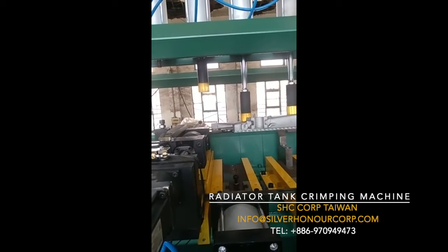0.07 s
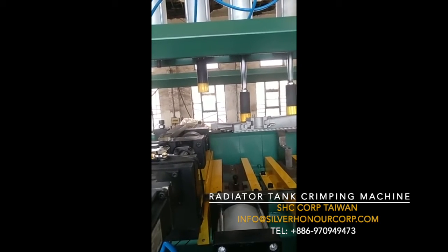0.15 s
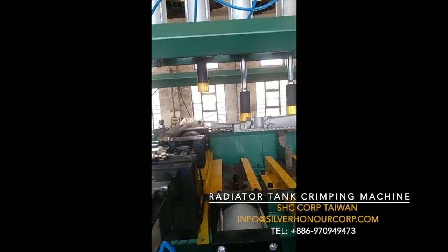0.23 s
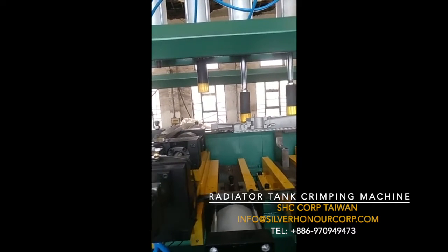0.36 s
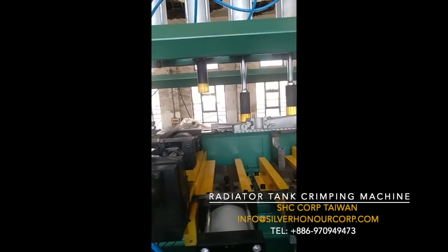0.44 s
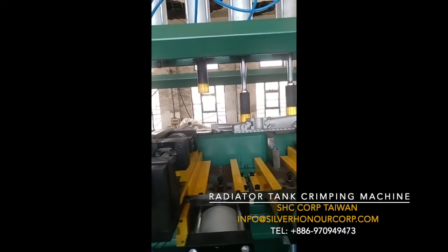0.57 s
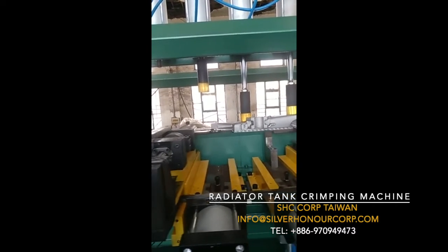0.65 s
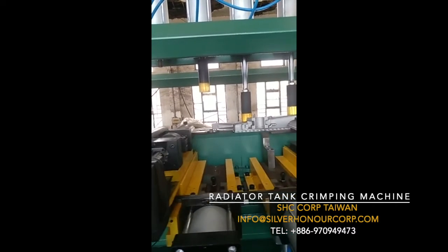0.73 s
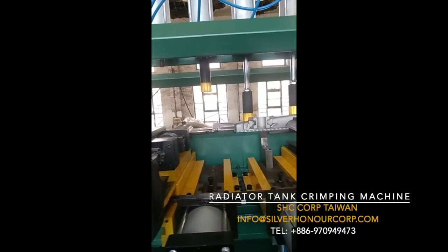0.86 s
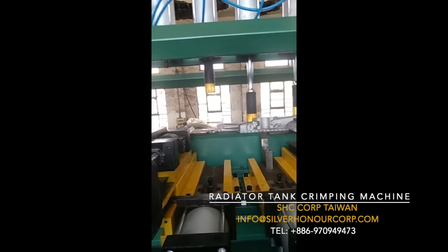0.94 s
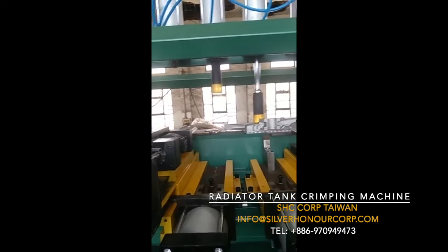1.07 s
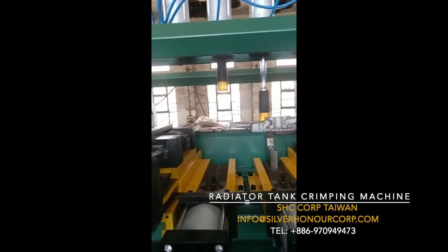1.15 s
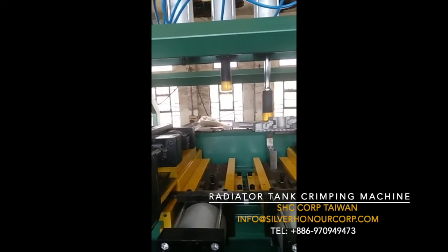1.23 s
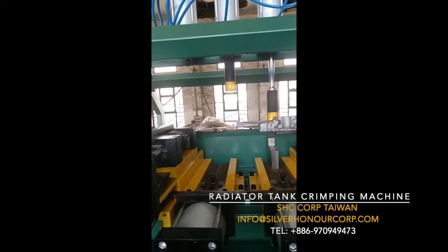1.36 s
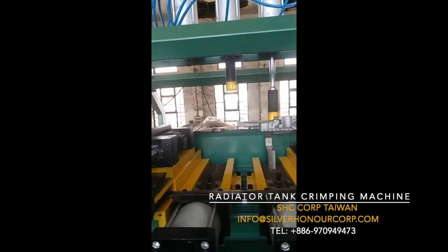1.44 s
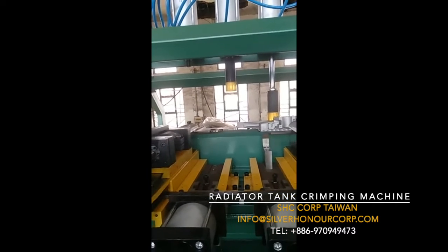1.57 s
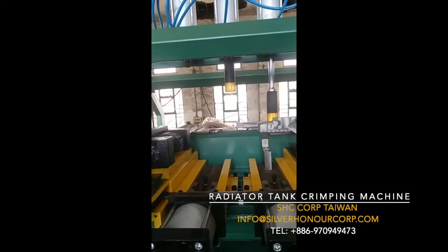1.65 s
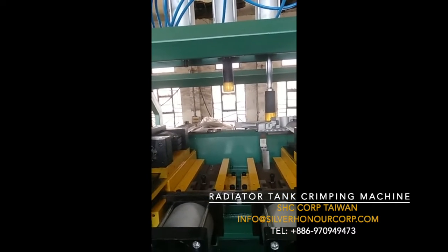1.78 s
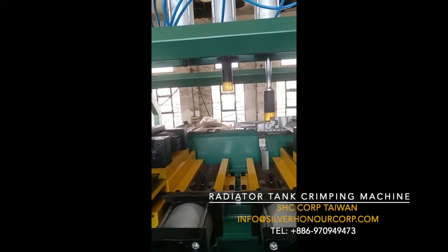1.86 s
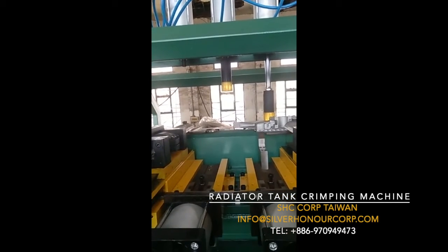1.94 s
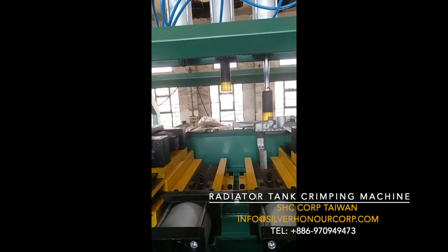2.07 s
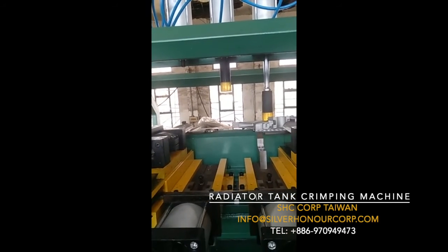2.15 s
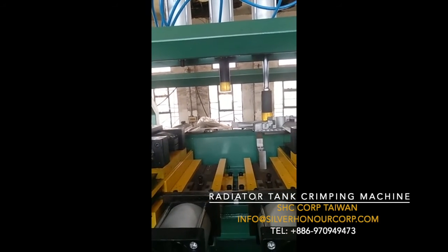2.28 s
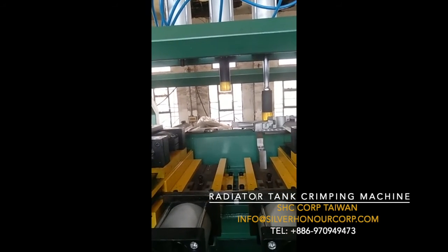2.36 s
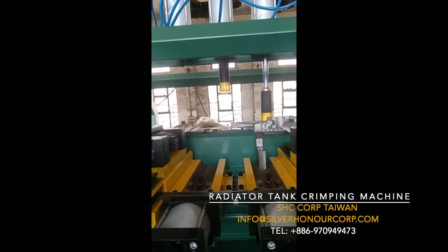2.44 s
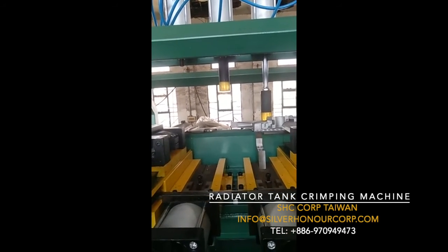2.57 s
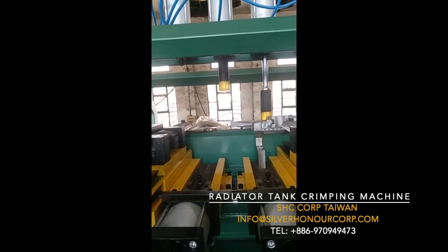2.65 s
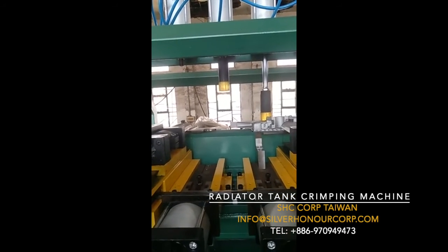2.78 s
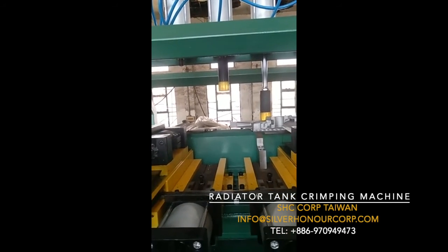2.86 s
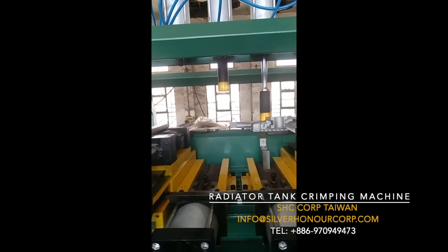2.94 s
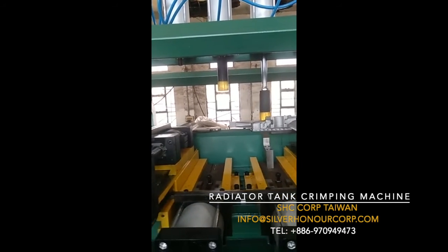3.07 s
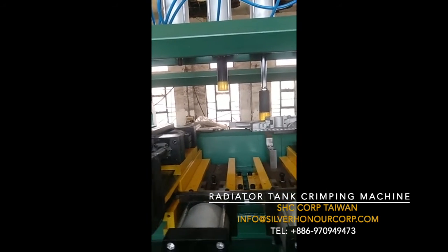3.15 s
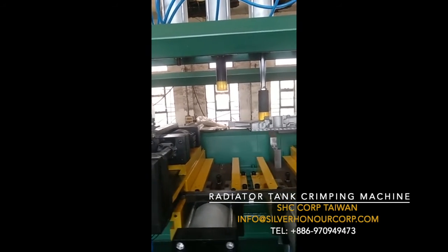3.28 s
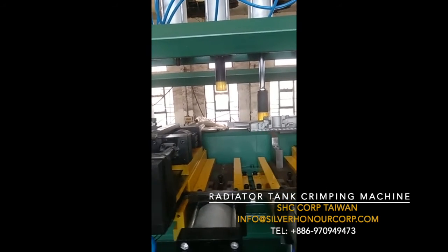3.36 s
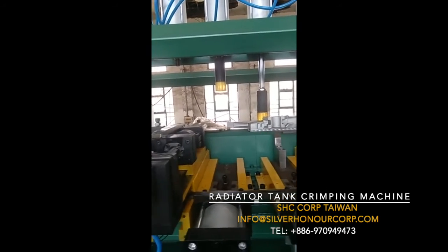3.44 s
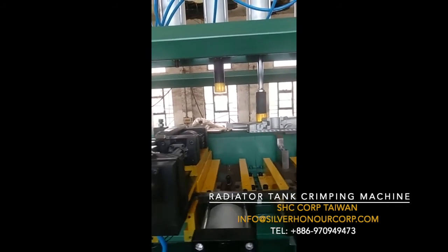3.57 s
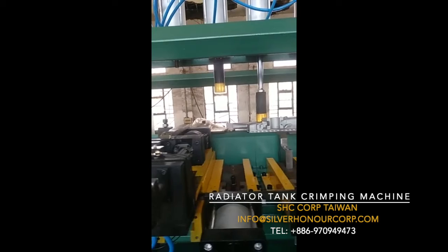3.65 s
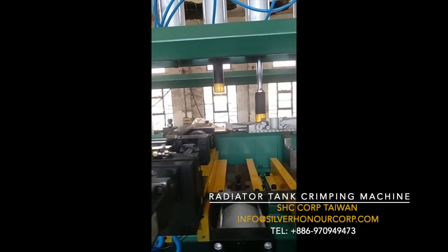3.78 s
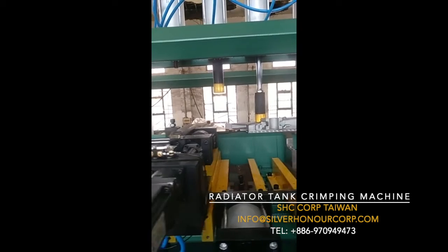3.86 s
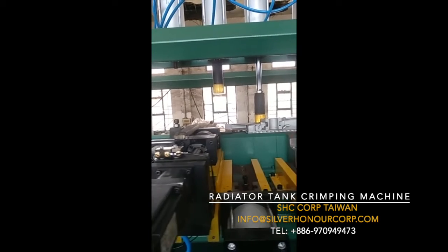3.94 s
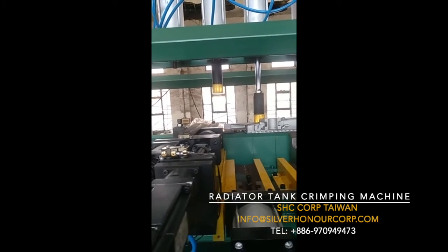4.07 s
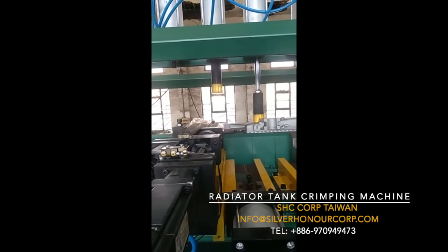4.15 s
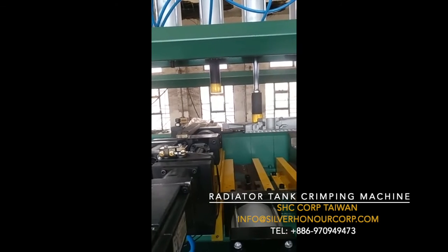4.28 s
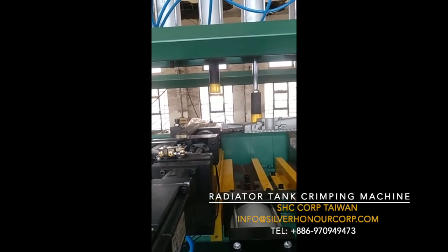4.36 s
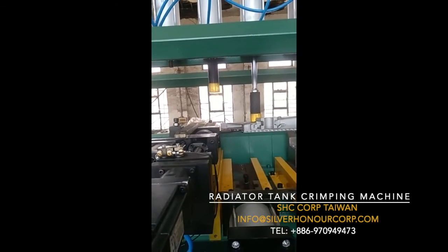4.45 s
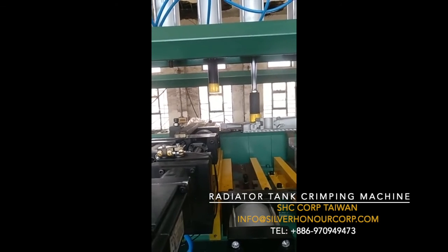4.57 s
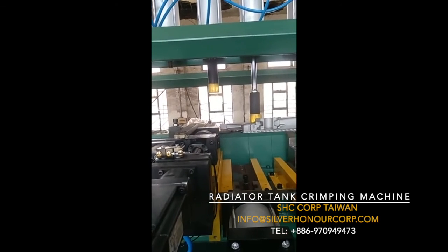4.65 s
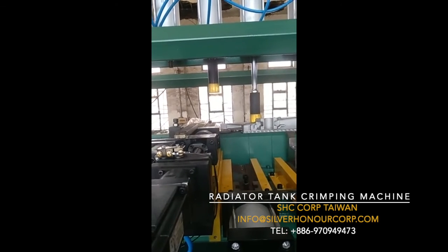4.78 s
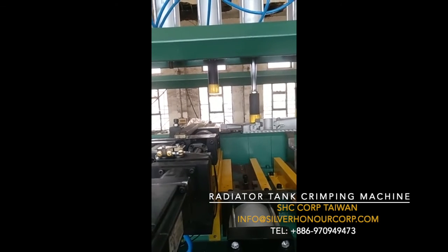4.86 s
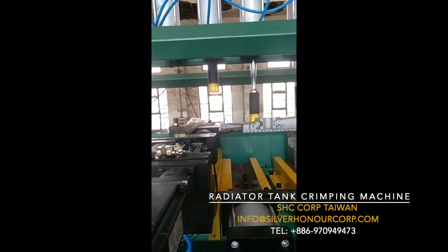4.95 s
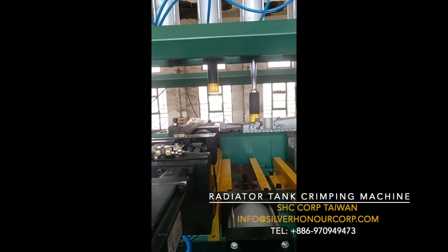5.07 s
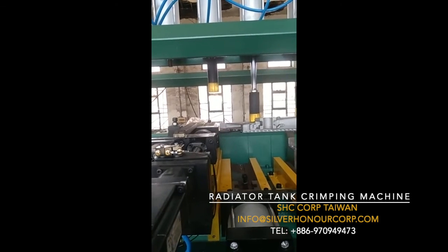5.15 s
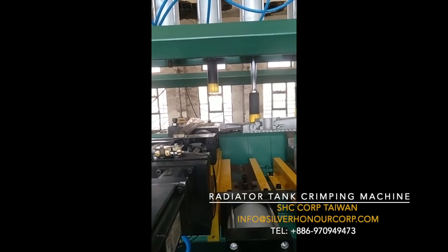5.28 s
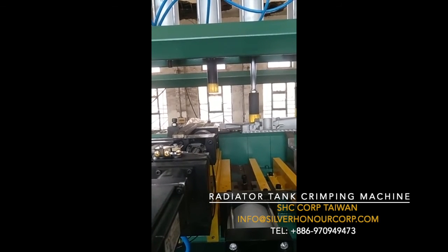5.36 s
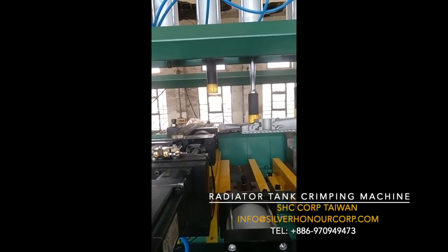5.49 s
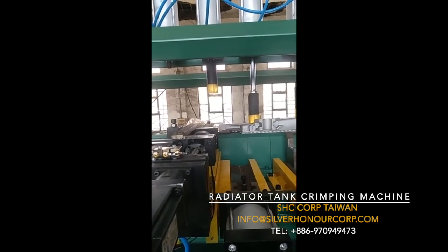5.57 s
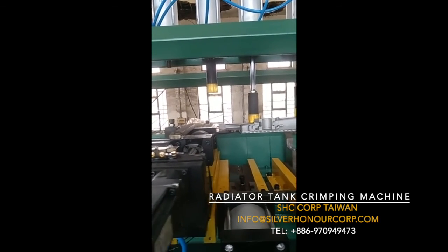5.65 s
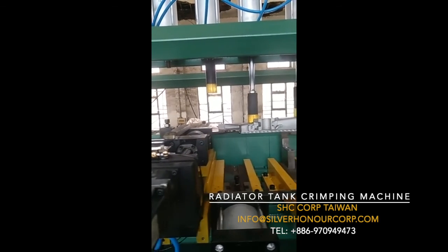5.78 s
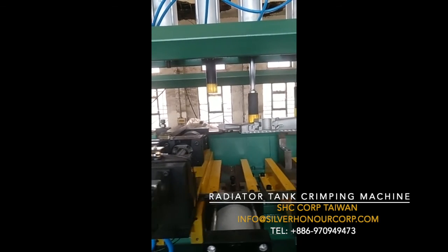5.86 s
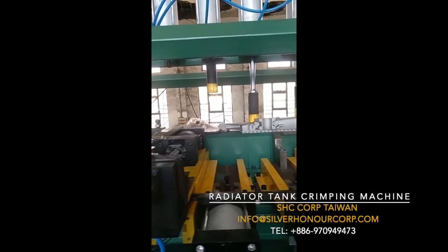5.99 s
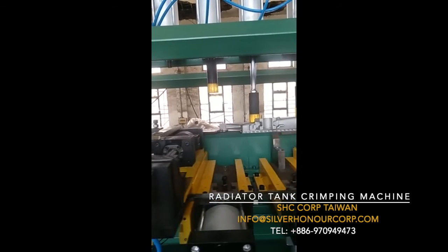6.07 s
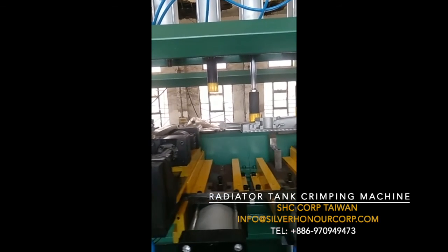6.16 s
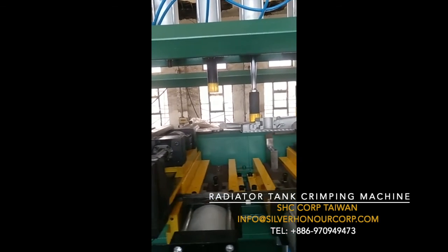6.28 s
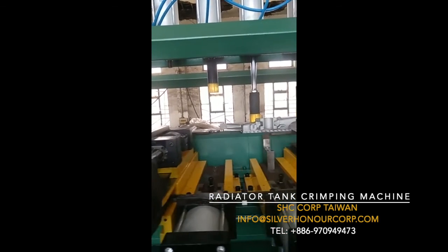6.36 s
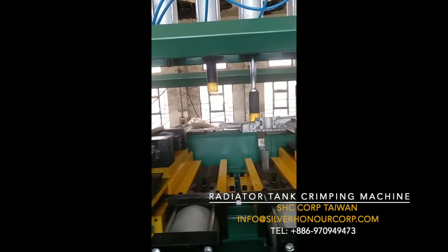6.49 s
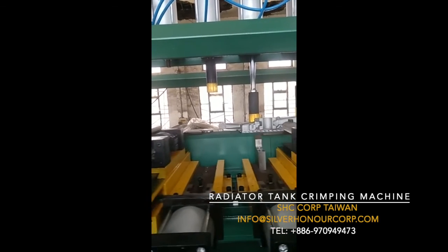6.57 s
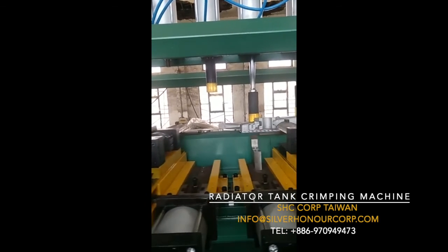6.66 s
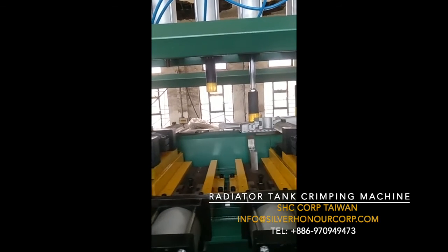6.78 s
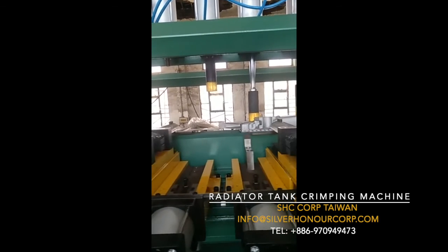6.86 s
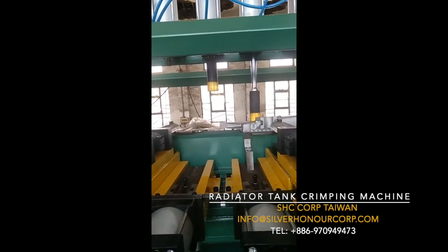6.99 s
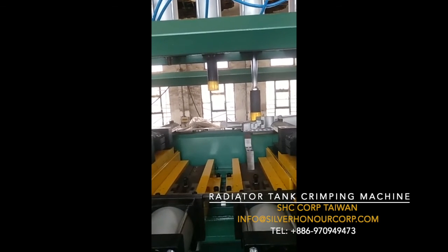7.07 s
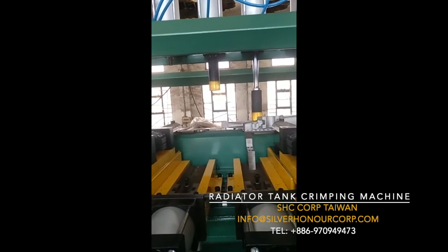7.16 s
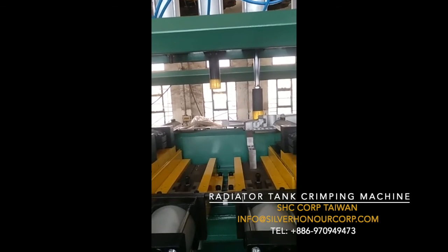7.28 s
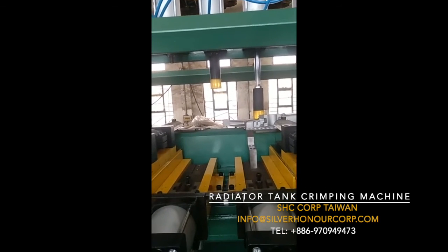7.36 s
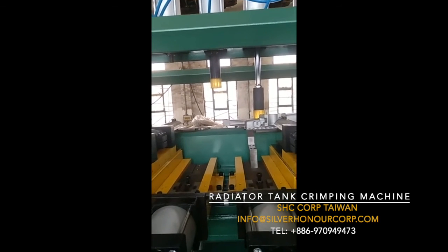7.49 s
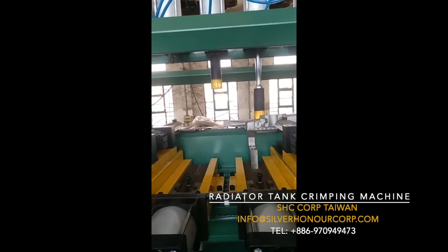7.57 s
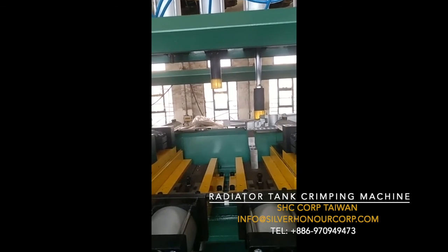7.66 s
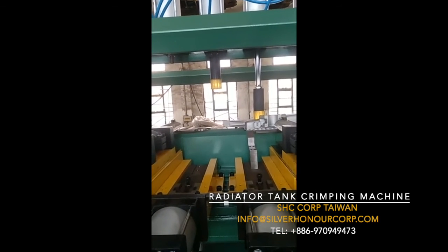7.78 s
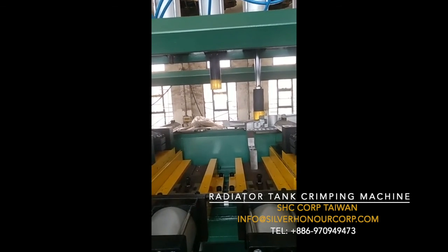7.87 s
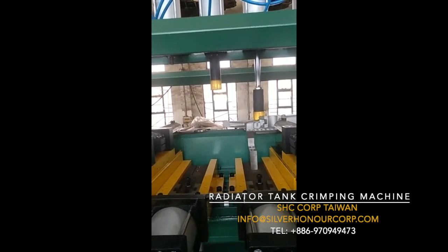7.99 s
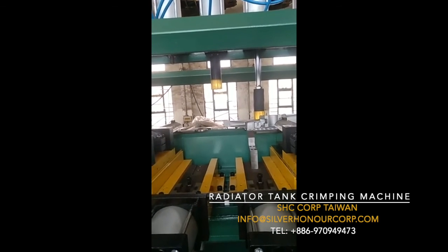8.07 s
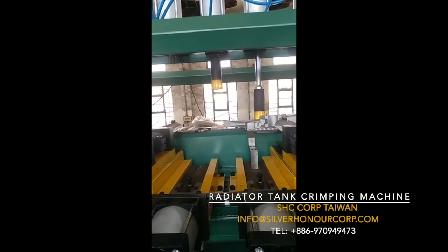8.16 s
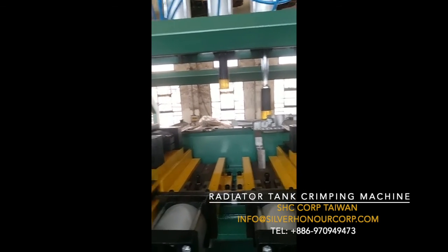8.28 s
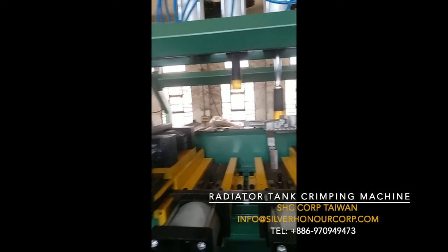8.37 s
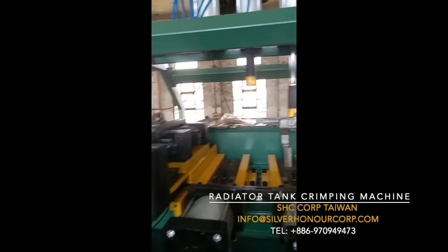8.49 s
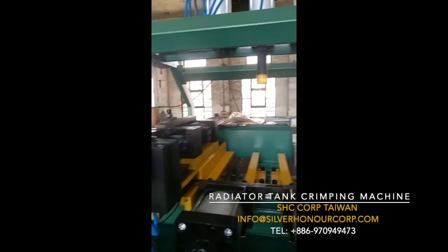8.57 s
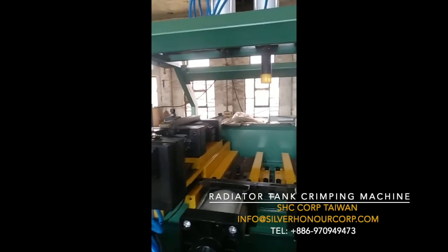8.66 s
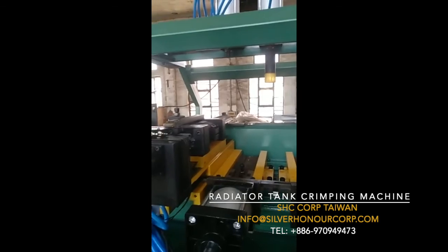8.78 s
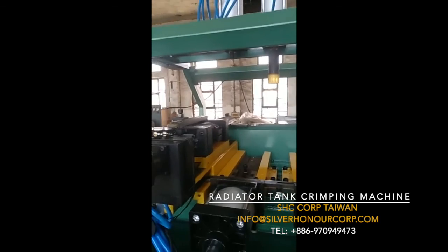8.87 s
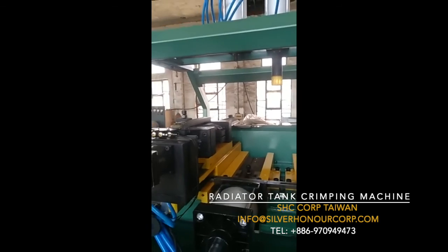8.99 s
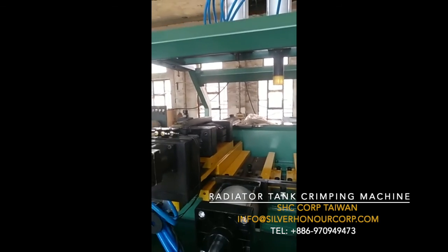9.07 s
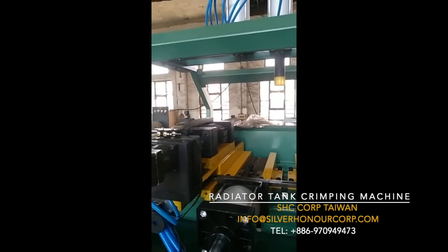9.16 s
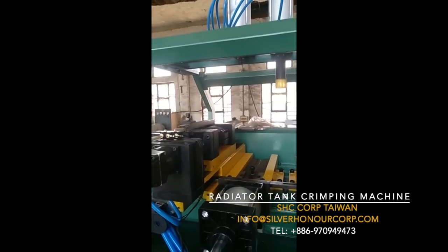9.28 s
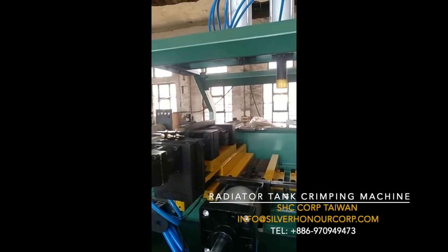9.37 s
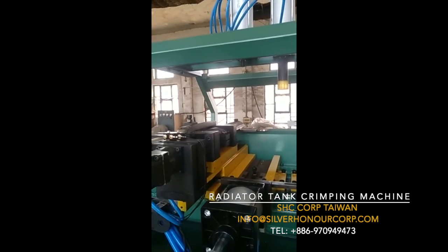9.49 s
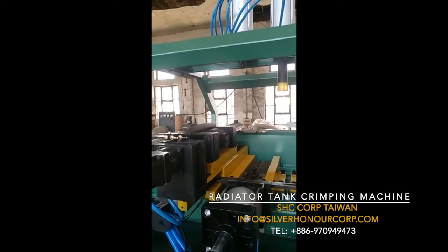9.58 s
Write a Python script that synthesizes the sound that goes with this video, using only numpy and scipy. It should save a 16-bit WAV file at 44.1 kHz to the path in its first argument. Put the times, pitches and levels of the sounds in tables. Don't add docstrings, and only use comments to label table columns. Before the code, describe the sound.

Three abrupt, loud bursts of compressed air with fast whirring gear teeth, each starting with a sharp valve knock and steady until braking, its tail bleeding into the hall. Between the first two, a short clattering feed slide; after the third, two seconds of dense metallic ticking with small motor groans. Distant machines murmur and whine faintly. Mono phone pickup with limited treble.

```python
import sys
import numpy as np
from scipy import signal
from scipy.fft import rfft, irfft
from scipy.io import wavfile
from scipy.ndimage import uniform_filter1d, map_coordinates

SR = 44100
rng = np.random.default_rng(int(sys.argv[2]) if len(sys.argv) > 2 else 0)


def gain_from_db(level_db):
    decades = np.asarray(level_db, float) / 20
    return 10 ** decades


def transcribe(signal):
    frames = np.atleast_2d(signal).T
    limited = np.clip(frames, -1, 1)
    pcm = np.round(limited * 32767).astype(np.int16)
    wavfile.write(sys.argv[1], SR, pcm)


N = 424683
T = np.arange(N) / SR
TOP_HZ = 7570


def unit(x):
    return x / np.sqrt(np.mean(x ** 2) + 1e-20)


def along(points, hz):
    f, v = np.transpose(points)
    return np.interp(np.log(hz + 1), np.log(f + 1), v)


def curves(rows):
    s, *cols = np.transpose(rows)
    gate = uniform_filter1d(1. * ((T > s[0]) & (T < s[-1])), size=400)
    return [gate] + [np.interp(T, s, c) for c in cols]


def wobble(rate):
    return map_coordinates(rng.standard_normal(int(N * rate / SR) + 4), [T * rate])


def coloured(x, spectrum):
    m = 8192
    cep = irfft(np.log(gain_from_db(along(spectrum, np.fft.rfftfreq(m, 1 / SR))) + 1e-6), m)
    cep[1:m // 2] *= 2
    cep[m // 2 + 1:] = 0
    return signal.fftconvolve(x, irfft(np.exp(rfft(cep)), m))[:N]


def rush(spectrum, patchy_db):
    z = signal.stft(rng.standard_normal(N), nperseg=512)[2]
    field = uniform_filter1d(rng.standard_normal(z.shape), size=6, axis=0)
    field = uniform_filter1d(field, size=9, axis=1)
    patchy = signal.istft(z * gain_from_db(patchy_db * unit(field)), nperseg=512)[1][:N]
    return unit(coloured(patchy, spectrum))


def tones(lines, unsteady_db):
    return sum(gain_from_db(db + 0.5 + unsteady_db * wobble(5.4)) * np.sin(2 * np.pi * hz * T) for hz, db in lines)


# frequency in Hz, density in dB per Hz.
MURMUR = [(12, -50.5), (20, -26.5), (103, -4), (245, -1.5), (373, -4.5), (569, -2.5), (1140, -6.5),
          (1260, -1), (1530, -5.5), (2340, -8.5), (2650, -3.5), (2850, -7), (3150, -10.5), (6150, -11),
          (7500, -11), (9750, -46), (16500, -120)]
# frequency in Hz, level in dB.
FAR_LINES = [(247.6, -57), (948, -60), (1237, -51), (1389, -53), (2628, -58)]
# time in seconds, level in dB.
HOLDING_DRIVE = [(0, -49), (.2, -57), (1.8, -45.5), (2.6, -47.5), (4.5, -47.5), (5.5, -49), (7, -51.5),
                 (7.3, -60), (9.64, -54.5)]
MURMUR_DB, SERVO_HZ = -37, 2668.5


def machines():
    servo_db = curves(HOLDING_DRIVE)[1] + 4.5 + .7 * wobble(2.5)
    servo = gain_from_db(servo_db) * np.sin(2 * np.pi * SERVO_HZ * T)
    murmur = gain_from_db(MURMUR_DB - 2.5) * rush(MURMUR, patchy_db=1.96)
    return murmur + tones(FAR_LINES, unsteady_db=2.0) + servo


# frequency in Hz, t60 in seconds.
HALL_DECAY = [(100, 2.1), (500, 1.26), (2000, 0.73), (7000, 0.27)]


def hall(x):
    hz, t, z = signal.stft(rng.standard_normal(2 * SR), SR, nperseg=256)
    decay = gain_from_db(-60 * t / along(HALL_DECAY, hz)[:, None])
    tail = signal.istft(z * decay, SR, nperseg=256)[1]
    return signal.fftconvolve(x, tail / np.linalg.norm(tail))[:N]


# start in seconds, peak in dB, frequency in Hz, rise in seconds, t60 in seconds.
FRAME_KNOCKS = [(.149, -24, 2200, .002, .06), (.165, -14, 1500, .003, .05), (.166, -22, 6500, .002, .04),
                (1.5, -28, 290, .03, .8), (1.5, -35, 170, .04, 2), (2.711, -26, 1800, .003, .04),
                (2.719, -17, 3780, .003, .06), (2.715, -25, 220, .01, .4), (2.72, -20, 580, .02, .6),
                (2.8, -28, 165, .04, 1.2), (4.05, -35, 165, .05, 1.5), (4.1, -38, 200, .05, 1.5),
                (5.53, -25, 1300, .003, .06), (5.537, -19, 2800, .003, .04), (6.86, -31, 290, .03, .7),
                (6.85, -36, 160, .03, 1.)]


def knocks():
    out, t = np.zeros(N + 2 * SR), np.arange(SR) / SR
    for s, db, hz, rise, t60 in FRAME_KNOCKS:
        rough = 1 + .45 * map_coordinates(rng.standard_normal(SR), [t * hz / 6])
        envelope = gain_from_db(db - 60 * t / t60) * (1 - np.exp(-t / rise))
        out[round(s * SR):][:SR] += envelope * rough * np.sin(2 * np.pi * hz * t)
    return out[:N]


# time in seconds, load on the screw in dB.
TRAVELS = [
    [(2.225, -38), (2.259, -30.5), (2.267, -24.5), (2.277, -30.5), (2.321, -26), (2.633, -28), (2.64, -36)],
    [(7.42, -49), (7.45, -26.5), (7.57, -26), (8.01, -26.5), (8.48, -24.5), (8.85, -29), (9.63, -25.5)],
]
# time in seconds, peak in dB.
HARD_TICKS = [(2.2653, -14), (2.3126, -13), (2.3346, -12), (2.3614, -12), (2.4369, -11), (2.5371, -15),
              (2.581, -13), (7.5009, -14), (7.5258, -14), (7.5552, -15), (7.7772, -11), (7.8276, -14),
              (7.8511, -12), (7.9548, -10), (8.0531, -14), (8.1289, -17), (8.2551, -13), (8.3025, -12),
              (8.337, -13), (8.3759, -12), (8.4322, -11), (8.4542, -11), (8.55, -12), (8.6532, -14),
              (8.8029, -16), (9.1805, -13), (9.2539, -15), (9.3801, -12), (9.5043, -13), (9.5557, -12)]
FIRST_SCREW_TICK_S = 2.2635, 7.5024
SCREW_HZ, BALLS_HZ, RETURN_HZ = 39.9, 51, 68.8
SCREW_DB, BALLS_DB, RETURN_DB, SPREAD_DB = 8, 7, 5, 2.3
SCREW_SCATTER, BALLS_SCATTER = .03, .25


def tick_list():
    found = [(s + .0015, db + 1) for s, db in HARD_TICKS]
    hard_s = np.array(HARD_TICKS)[:, 0]
    trains = [(SCREW_HZ, SCREW_DB, SCREW_SCATTER), (BALLS_HZ, BALLS_DB, BALLS_SCATTER),
              (RETURN_HZ, RETURN_DB, BALLS_SCATTER)]
    for rows, first in zip(TRAVELS, FIRST_SCREW_TICK_S):
        s, load_db = np.transpose(rows)
        for hz, over_db, scatter in trains:
            chance = rng.standard_normal((160, 2))
            times = first + (np.arange(len(chance)) + scatter * chance[:, 0]) / hz
            clear = abs(times[:, None] - hard_s).min(axis=1) > .011
            free = (times < s[-1]) & clear
            peaks_db = np.interp(times, s, load_db) + over_db + SPREAD_DB * chance[:, 1]
            found += list(zip(times[free], peaks_db[free]))
    return found


# frequency in Hz, density in dB per Hz.
RAIL_RING = [(900, -42.5), (1400, -10), (1580, -16.5), (2250, -13.5), (2350, -14), (2480, -4.5), (2710, -2),
             (3270, -12.5), (3450, -20.5), (4080, -16), (4400, -20), (5600, -26), (6800, -21),
             (7600, -33.5)]
# frequency in Hz, level in dB.
RAIL_MODES = [(2250, -14), (2480, -7), (2712, 0), (3060, -11), (4055, -18)]
# frequency in Hz, density in dB per Hz.
MOTOR_HOUSING = [(150, -47), (230, -11), (400, -12.5), (600, -11), (900, -13.5), (1150, -15.5), (1600, -54)]
# frequency in Hz, level in dB.
MOTOR_LINES = [(360.4, -51), (449.6, -52), (480.6, -56), (869, -55), (899, -56), (1278.2, -52),
               (1358.7, -50), (1478.6, -49), (1578.2, -55)]
# start in seconds, length in seconds, first Hz, last Hz, peak in dB.
MOTOR_GROANS = [
    (2.426, 0.12, 528, 562, -35),
    (7.49, 0.1, 570, 583, -36),
    (7.646, 0.18, 545, 517, -36.5),
    (7.837, .1, 514, 496, -41),
    (7.597, 0.28, 188, 181, -40),
    (9.1, 0.24, 553, 558, -47),
    (9.27, 0.32, 650, 656, -42),
    (9.35, 0.19, 257, 262, -42),
]
TICK_MS, SLIDE_ATTACK_S, HOUSING_DB = 2.3, .015, -44


def slide():
    ticks, shake, scrape, hum = np.zeros(N + SR), np.zeros(N + SR), np.zeros(N), np.zeros(N)
    t = np.arange(-400, 400) / SR
    contacts = rng.standard_normal(N) * (rng.random(N) < .3) * gain_from_db(1.5 * wobble(90))
    chatter = unit(coloured(contacts, RAIL_RING))
    motor = rush(MOTOR_HOUSING, patchy_db=1.5)
    orders = tones(MOTOR_LINES, unsteady_db=4.5)
    for (s, db), (long, *spins) in zip(tick_list(), rng.random((500, 6))):
        width_s = .00075 * TICK_MS * (.6 + long) * (1 + .3 * np.sign(t))
        swell = gain_from_db(db) * np.exp(-(t / width_s) ** 2)
        ring = sum(gain_from_db(ring_db - 2.0) * np.sin(2 * np.pi * (hz * t + spin))
                   for (hz, ring_db), spin in zip(RAIL_MODES, spins))
        start = round(s * SR) + round(t[0] * SR)
        ticks[start:][:len(t)] += swell * ring
        shake[start:][:len(t)] += swell
    for rows in TRAVELS:
        gate, db = curves(rows)
        gate = gate * np.clip((T - rows[0][0]) / SLIDE_ATTACK_S, 0, 1)
        scrape += gate * gain_from_db(db - 2.5) * chatter
        hum += gate * (gain_from_db(HOUSING_DB) * motor + orders)
    for s, length, from_hz, to_hz, db in MOTOR_GROANS:
        share = np.clip((T - s) / length, 0, 1)
        cycles = np.cumsum(from_hz + (to_hz - from_hz) * share) / SR
        hum += gain_from_db(db) * np.sin(np.pi * share) ** 2 * np.sin(2 * np.pi * cycles)
    whole_rail = coloured(shake[:N] * contacts, RAIL_RING)
    return scrape + hum + gain_from_db(-1.5) * ticks[:N] + gain_from_db(-2) * whole_rail


# frequency in Hz, level in dB.
WEAK_ORDERS = [(60, -83.5), (130, -58.5), (170, -47), (300, -58.5), (420, -42), (800, -42), (1400, -53),
               (2000, -56), (3000, -50.5), (4000, -62), (7500, -66)]
SHAFT_HZ, TOOTH_ORDER = 14.021, 27


def one_turn(strong):
    order = np.arange(4097)
    hz = order * SHAFT_HZ
    size = gain_from_db(along(WEAK_ORDERS, hz)) * rng.rayleigh(.7, len(order)) * (hz < TOP_HZ)
    for k, db in strong:
        size[round(k)] = gain_from_db(db)
    beside = order - TOOTH_ORDER
    phase = np.where(abs(beside) < 2, -.8 * beside ** 2, 2 * np.pi * rng.random(len(order)))
    phase[49:54] = 0
    return irfft(size * np.exp(1j * phase)) * len(order) * np.sqrt(2)


LEAK_DB, LEAK_RISE_DB, BLAST_RISE_S = -22.5, 14.5, .004
SURGE_DB, SURGE_S, SURGE_HISS_DB = 5, .022, 2
BLEED_DB, BLEED_DB_PER_S, BLEED_HISS_DB = -23, 31.5, 2
RUMBLE_DB, JOLT_DB, JOLT_S, THUD_S = -57, -35.5, .04, .078


def air_supply(valve, blast, late, braked, brake_db, thud_db):
    after = np.maximum(T - blast, 0)
    opened = np.interp(T, [valve, blast - BLAST_RISE_S, blast], [LEAK_DB, LEAK_DB + LEAK_RISE_DB, 0])
    surge = np.exp(-after / SURGE_S)
    flow = (T > valve) * gain_from_db(opened + SURGE_DB * surge)
    fall = gain_from_db(-brake_db * braked)
    bleed = gain_from_db(BLEED_DB - BLEED_DB_PER_S * braked)
    drive = flow * (fall + bleed)
    jet = flow * gain_from_db(SURGE_HISS_DB * surge) * (fall + gain_from_db(BLEED_HISS_DB) * bleed)
    jolt = (T > blast) * gain_from_db(JOLT_DB) * np.exp(-after / JOLT_S)
    thud = gain_from_db(thud_db) * np.exp(-((late - THUD_S) / THUD_S) ** 2)
    return drive, jet, gain_from_db(RUMBLE_DB) * drive + jolt + thud


# valve opens in seconds, air blast in seconds, steady roar in dB,
# exhaust hiss in dB re roar.
GEAR_RUNS = [
    (.146, .166, -16, -12),
    (2.706, 2.719, -16, -10.5),
    (5.526, 5.538, -16, -11.5),
]
# direction (0 forward, 1 back), angle in turns,
# once-a-turn hiss depth from 0 to 1, easing of the tooth tone in dB per second.
SHAFT_RUNS = [
    (0, .55, .27, 7),
    (1, -.07, .06, -1),
    (0, .29, .27, 6),
]
# teeth mesh within seconds, held seconds,
# braking in dB per second, brake thud in dB.
BRAKING = [
    (0.065, 1.33, 95, -40.5),
    (0.039, 1.352, 79, -39.5),
    (0.043, 1.326, 91.5, -37.5),
]
# multiple of the shaft rate, level in dB.
FORWARD_ORDERS = [(16, -37.3), (24, -42.2), (25, -39.2), (26, -35.7), (27, -24.3), (28, -35.2), (29, -36.9),
                  (36, -34.5), (46, -37.2), (49, -36.7), (50, -33.3), (51, -35.0), (52, -37.0), (53, -31.5),
                  (61, -37.8), (62, -36.2), (64, -31.5), (65, -36.3), (71, -37.7), (75, -36.0), (78, -32.3),
                  (79, -37.9), (88, -37.1), (89, -35.2), (94, -35.9), (95, -39.4), (113, -40.4),
                  (117, -42.2)]
BACK_ORDERS = [(16, -38.9), (26, -33.5), (27, -32.5), (28, -37.6), (37, -35.3), (39, -34.8), (49, -33.5),
               (50, -37.1), (51, -31.8), (52, -31.6), (54, -34.1), (56, -36.2), (57, -35.2), (60, -28.4),
               (62, -30.2), (64, -32.0), (65, -33.6), (75, -37.2), (76, -31.5), (77, -32.2), (79, -36.0),
               (88, -34.3), (92, -35.7), (93, -39.3), (95, -38.2), (105, -38.4), (110, -39.5), (126, -41.4)]
# frequency in Hz, density in dB per Hz.
AIR_ROAR = [(60, -77), (100, -40), (200, -16), (310, -16), (380, -6), (450, -13), (700, -11), (1070, -8),
            (1400, -9), (2870, -12), (3300, -20), (3500, -29), (4700, -42), (7900, -120)]
EXHAUST_HISS = [(1880, -34), (3200, 4), (3510, 0.5), (4060, 0.5), (5310, -3), (6340, 1.5), (7240, -1.5),
                (7500, -12.5), (9750, -44), (16500, -120)]
FRAME_RUMBLE = [(15, -34), (30, -12), (60, -12.5), (100, -10.5), (130, -10), (200, -63)]
MESH_ORDERS = 32
KNEE_S, COAST_DB_PER_S = .044, 14.5
UNMESHED_DB, TEETH_DB, MESH_DB = -26, -.8, .3


def gears():
    patterns = one_turn(FORWARD_ORDERS), one_turn(BACK_ORDERS)
    roar, hiss = rush(AIR_ROAR, patchy_db=1.5), rush(EXHAUST_HISS, patchy_db=2.0)
    rumble = rush(FRAME_RUMBLE, patchy_db=6.0)
    air, teeth, wander = np.zeros(N), np.zeros(N), wobble(3)
    clatter_db = 1.2 * wobble(11)
    load_db = 1.2 * wobble(7)
    for run, shaft, braking in zip(GEAR_RUNS, SHAFT_RUNS, BRAKING):
        valve, blast, roar_db, hiss_db = run
        way, angle, depth, ease_db = shaft
        mesh_s, held_s, brake_db, thud_db = braking
        since, after = np.maximum(T - valve, 0), np.maximum(T - blast, 0)
        late = T - blast - held_s
        braked = KNEE_S * np.logaddexp(0, late / KNEE_S)
        drive, jet, frame = air_supply(valve, blast, late, braked, brake_db, thud_db)

        turns = angle + SHAFT_HZ * (T + .018 * np.exp(-since / .07)) + .0015 * wander
        pattern = patterns[round(way)]
        mesh = irfft(rfft(pattern)[:MESH_ORDERS], len(pattern))
        place = [turns % 1 * len(pattern)]
        low = map_coordinates(mesh, place, order=1, mode="grid-wrap")
        high = map_coordinates(pattern - mesh, place, order=1, mode="grid-wrap")
        turn = gain_from_db(MESH_DB - ease_db * (after - held_s / 2)) * low + gain_from_db(clatter_db) * high
        unmeshed_db = UNMESHED_DB * np.exp(-after / mesh_s)
        teeth += drive * gain_from_db(TEETH_DB + unmeshed_db - COAST_DB_PER_S * braked + load_db) * turn

        puff = 1 + depth * np.cos(2 * np.pi * (turns - .5))
        exhaust = gain_from_db(hiss_db - 1.5) * jet * puff * hiss
        air += gain_from_db(roar_db) * (gain_from_db(-4.5) * drive * roar + exhaust) + frame * rumble
    return air, teeth


def scene():
    (air, teeth), feed = gears(), slide()
    air = air + knocks()
    echo = hall(gain_from_db(-8) * air + gain_from_db(-16) * teeth + gain_from_db(-13) * feed)
    mono = air + teeth + feed + echo + machines()
    return np.array([mono, mono])


def roll_off(x):
    return signal.sosfilt(signal.butter(12, 8420, fs=SR, output="sos"), x)


def record(dry):
    soft = dry / (1 + abs(dry / 1.8) ** 4) ** (1 / 4)
    narrow = irfft(rfft(soft) * (np.fft.rfftfreq(N, 1 / SR) < TOP_HZ), N)
    return roll_off(narrow)


dry = scene()
out = record(dry)
transcribe(out)
```